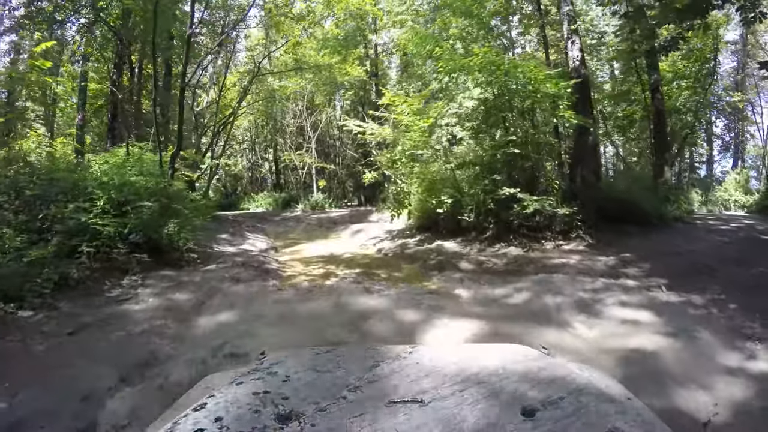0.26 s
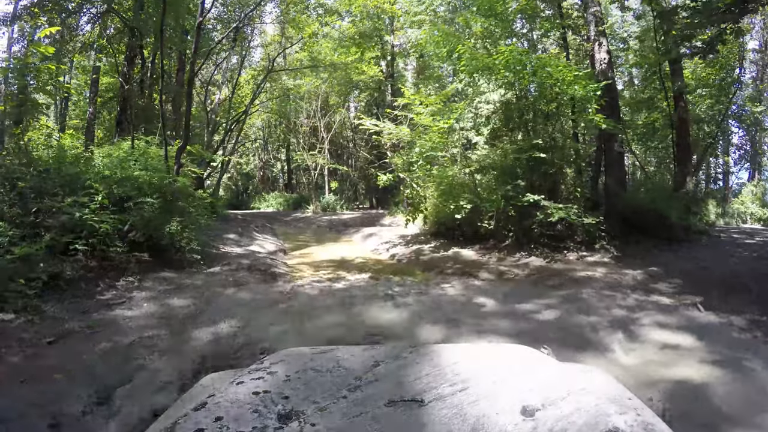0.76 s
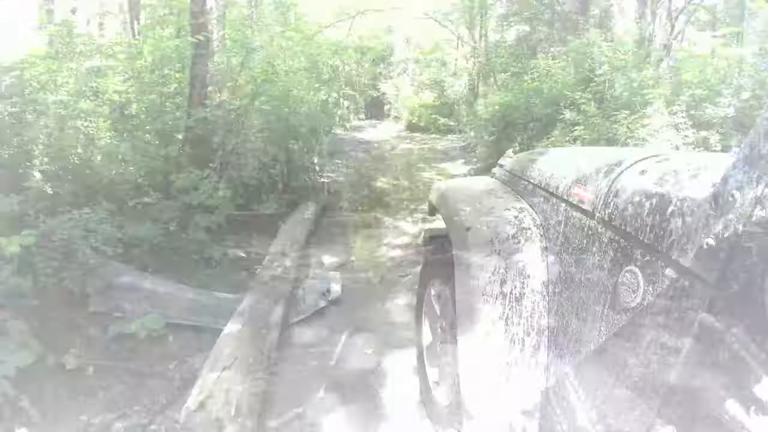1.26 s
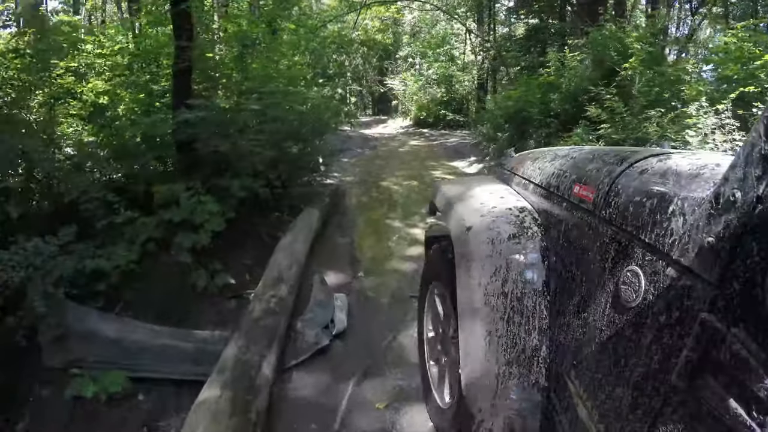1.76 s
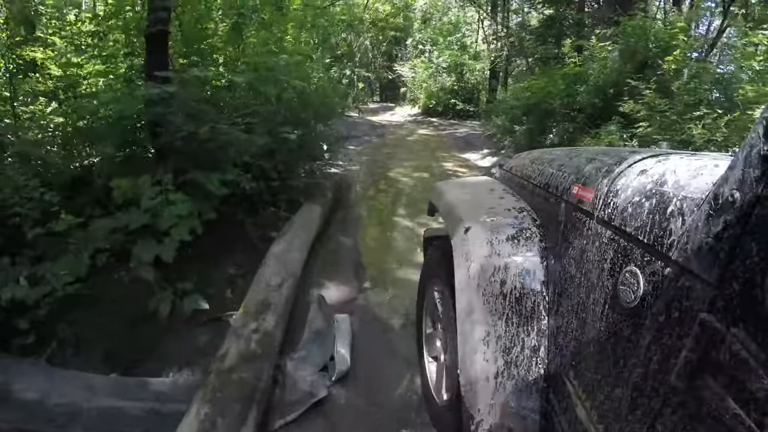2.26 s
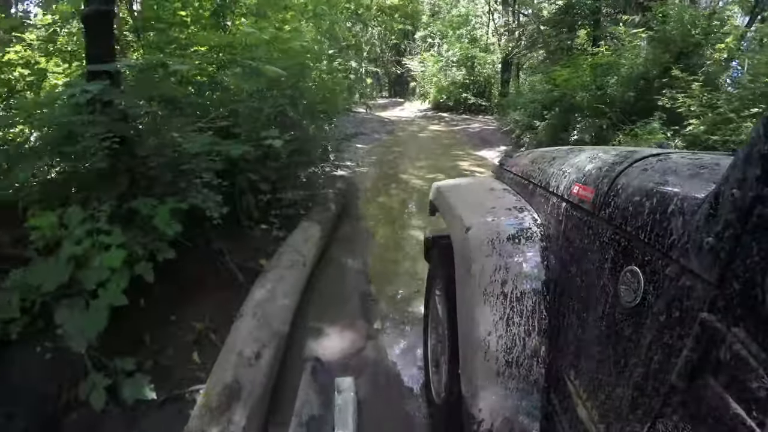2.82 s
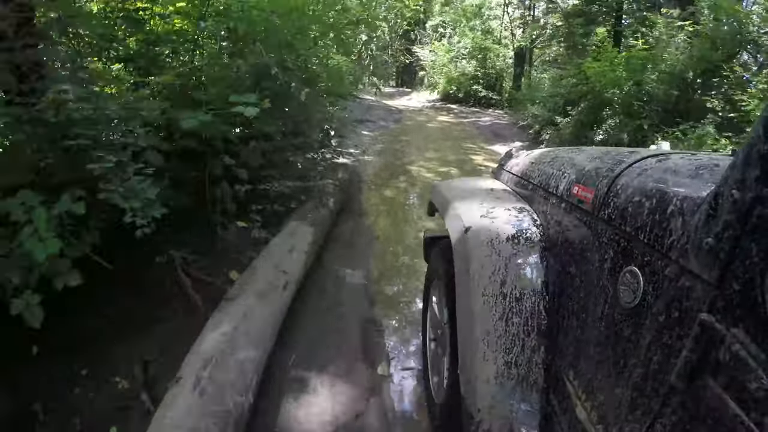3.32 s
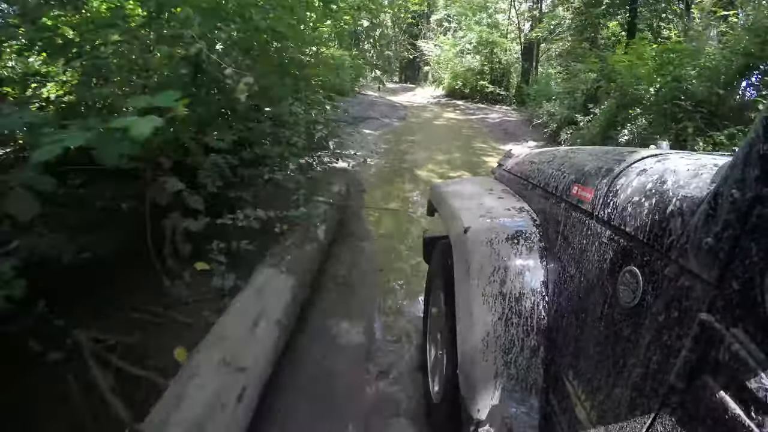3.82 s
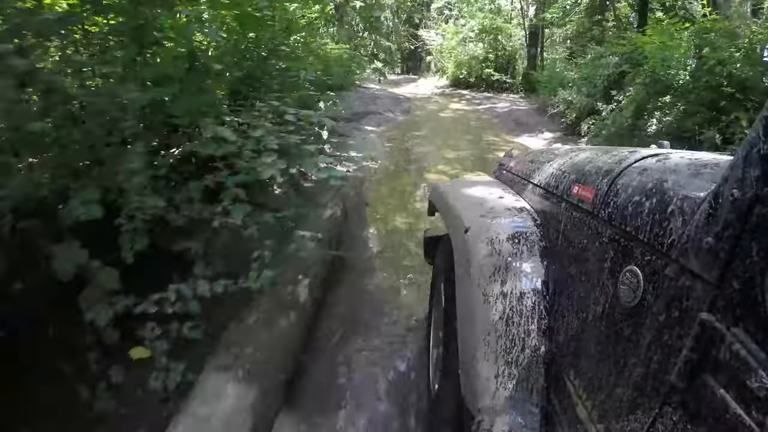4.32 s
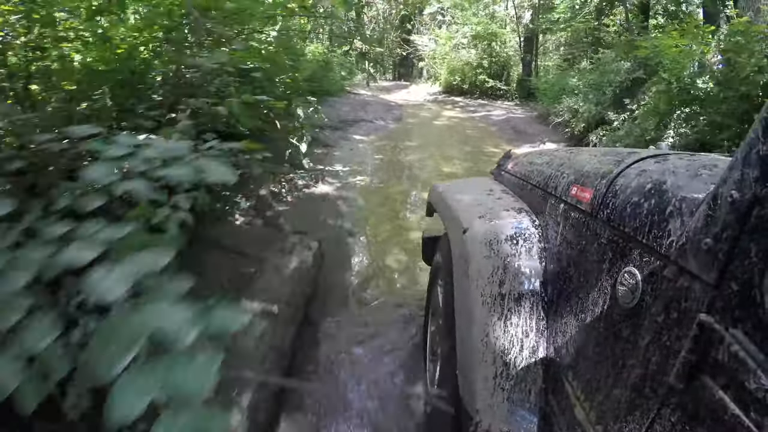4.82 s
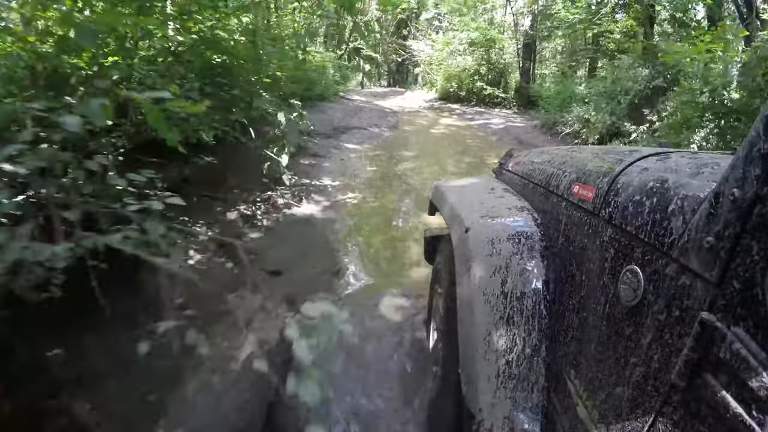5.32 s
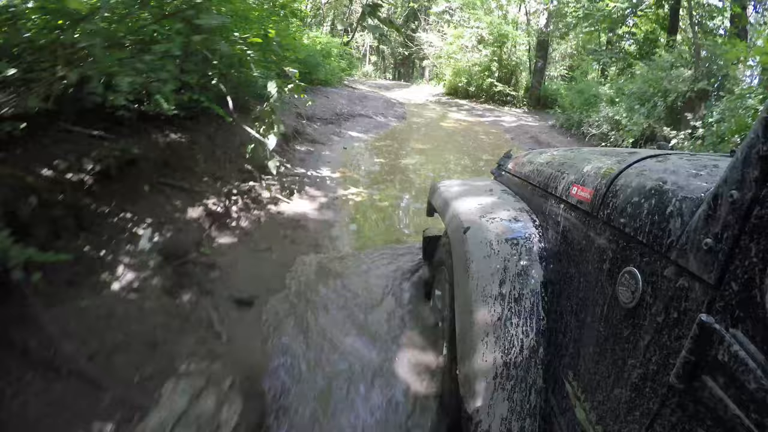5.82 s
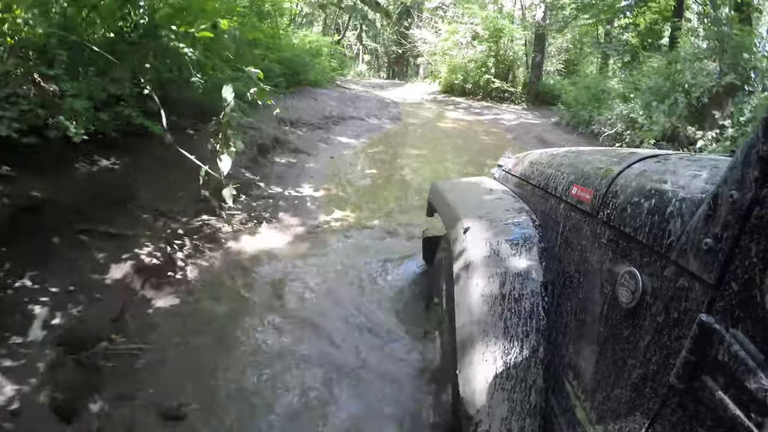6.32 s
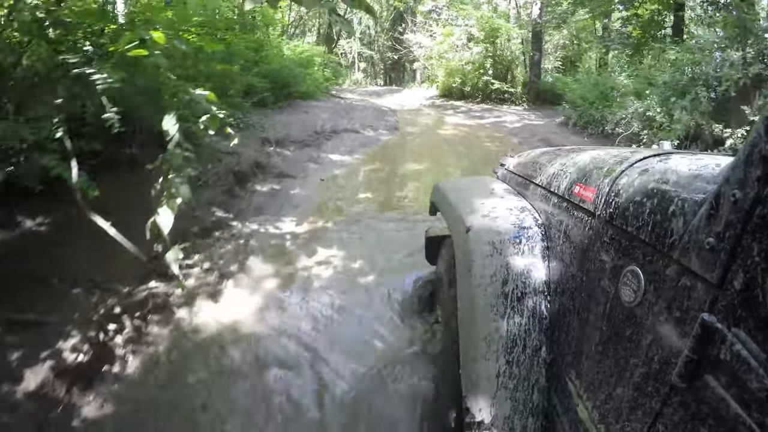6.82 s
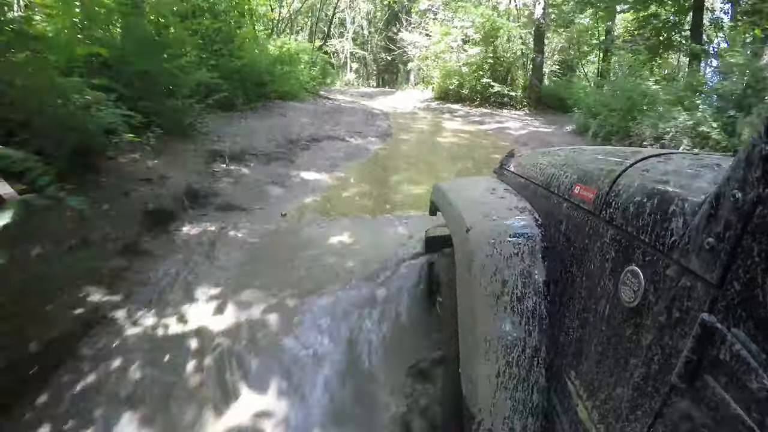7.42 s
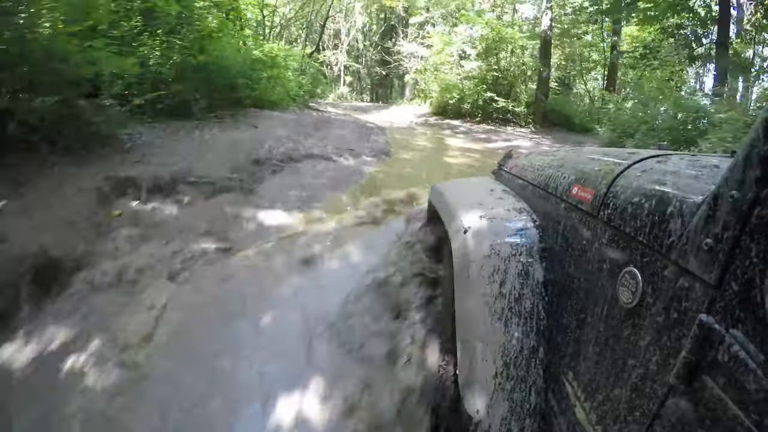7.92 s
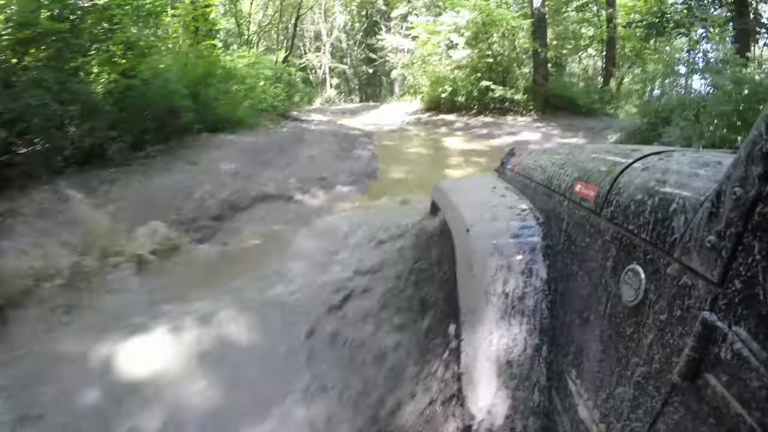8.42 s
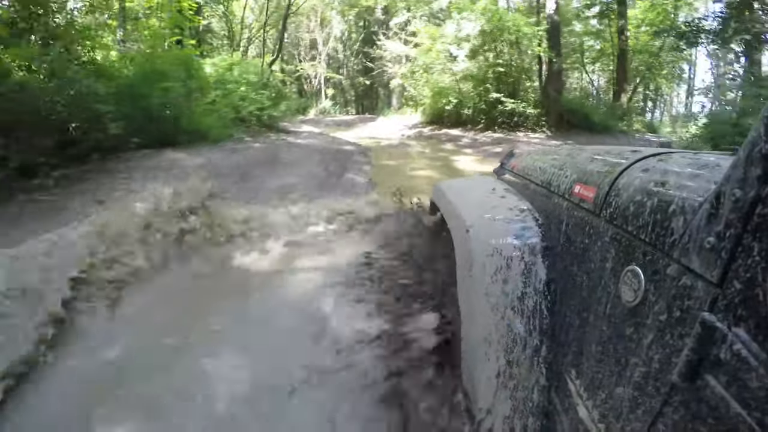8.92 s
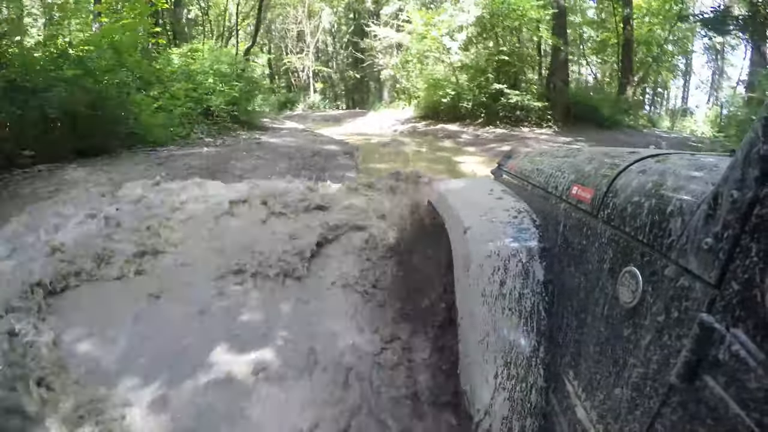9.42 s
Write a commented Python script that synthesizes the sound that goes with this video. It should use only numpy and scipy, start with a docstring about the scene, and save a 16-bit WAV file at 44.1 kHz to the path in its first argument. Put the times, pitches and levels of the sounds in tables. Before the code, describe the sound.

Low engine boom with a metallic rattle fades to quiet idling, crackling twigs and grit, then rising sloshing mud, roaring revs and suspension knocks.

```python
"""A six-cylinder four-wheel-drive engine on a forest trail, heard by a cased camera fixed to the body.
On the bonnet, sines at crankshaft orders and filtered noise drone and rev while a loose fitting rings.
The sound dissolves to the side of the cab: twigs and stones crack as noise bursts and ringing modes,
then a mud hole sloshes, splashes and bubbles, built of noise and tiny grains, as the engine revs up.
The camera mount shudders throughout, a low sine that sways and throbs."""
import sys
import numpy as np
from scipy import signal
from scipy.fft import rfft, irfft, next_fast_len
from scipy.io import wavfile
from scipy.ndimage import uniform_filter1d

SR = 44100
rng = np.random.default_rng(int(sys.argv[2]) if len(sys.argv) > 2 else 0)


def put_to_file(sound):
    """Save the sound as 16-bit audio at rate SR, in the file named by the first command-line argument."""
    columns = np.atleast_2d(sound).T  # one column per channel
    safe = np.clip(columns, -1, 1)
    whole_steps = np.round(safe * 32767)
    wavfile.write(sys.argv[1], SR, whole_steps.astype(np.int16))


N = 426006
T = np.arange(N) / SR


def amp(db):
    """Decibels to gain."""
    return 10 ** (np.asarray(db) / 20)


def evened(x):
    """Scales to rms 1."""
    return x / np.sqrt(np.mean(x ** 2) + 1e-20)


def noise():
    """White noise as long as the scene."""
    return rng.standard_normal(N)


def curves(rows):
    """Each column of a table, joined by straight lines in time."""
    s, *columns = np.transpose(rows)
    return [np.interp(T, s, c) for c in columns]


def response_db(points, modes, hz):
    """A broad spectrum, falling away beyond its end points, with resonant bumps on it."""
    f, db = np.transpose(points)
    broad = np.interp(np.log(hz + 1), np.log(f + 1), db)
    beyond = np.maximum(hz / f[-1], 1) * np.maximum(f[0] / (hz + 1), 1)
    bumps = sum(lift / (1 + (2 * (hz - centre) / width) ** 2) for centre, width, lift in modes)
    return broad - 30 * np.log10(beyond) + bumps


def coloured(x, points, modes=()):
    """Passes x through a spectrum and its resonances; rms 1."""
    size = next_fast_len(N + 8192)
    hz = np.fft.rfftfreq(size, 1 / SR)
    spectrum = rfft(x, size) * amp(response_db(points, modes, hz))
    return evened(irfft(spectrum, size)[:N])


def wander(rate_hz):
    """Smooth chance of rms 1 that changes at about this rate."""
    steps, rate = 8192, 800  # points, and points a second
    hz = np.fft.rfftfreq(steps, 1 / rate)
    slow = irfft(rfft(rng.standard_normal(steps)) * np.exp(-(hz / rate_hz) ** 2))
    return np.interp(T, np.arange(len(slow)) / rate, evened(slow))


def add(mix, s, sound):
    """Mixes a sound in at time s."""
    part = mix[max(round(s * SR), 0):][:len(sound)]
    part += sound[:len(part)]


def order_tone(turns, k):
    """A sine of rms 1 at k times the crankshaft."""
    return np.sqrt(2) * np.sin(2 * np.pi * (k * turns + rng.random()))


def cylinders(turns, whole_db, half_db, order, count):
    """Three firings a turn; unequal cylinders add whole and half orders between, from the given order up."""
    out = np.zeros(N)
    half_order_step = np.exp(1j * np.pi * turns)
    partial = np.exp(2j * np.pi * order * turns)
    for k in range(2 * order, 2 * order + count):  # k counts half orders
        strength = amp(0 if k % 6 == 0 else whole_db if k % 2 == 0 else half_db)
        start_phase = np.exp(2j * np.pi * rng.random())
        out += (strength * start_phase * partial).real
        partial = partial * half_order_step
    return evened(out)


def ring(modes, detune, rise_s):
    """One blow on a set of modes, never twice alike; peak 1."""
    t = np.arange(SR // 4) / SR
    hz, db, t60 = np.transpose(modes)[:, :, None]
    hz = hz * (1 + detune * rng.standard_normal(hz.shape))
    decay = amp(db - 60 * t / t60)
    sound = (decay * np.sin(2 * np.pi * (hz * t + rng.random(hz.shape)))).sum(0)
    sound *= 1 - np.exp(-t / rise_s)
    return sound / abs(sound).max()


def drops(per_s, spread_db):
    """A random train of impacts, most small and a few large."""
    size = amp(spread_db * np.minimum(rng.exponential(1, N), 4.5))
    return evened(size * noise() * (rng.random(N) < per_s / SR))


def patter(per_s, spread_db, grain_s, low_hz, high_hz):
    """Many tiny bursts, spread over twelve pitches."""
    t, out = np.arange(SR // 40) / SR, np.zeros(N)
    for hz in np.geomspace(low_hz, high_hz, num=12):
        fuzz = uniform_filter1d(rng.standard_normal(len(t)), size=int(4 * SR / hz))
        grain = evened(fuzz * np.sin(2 * np.pi * hz * t) * np.exp(-t / grain_s))
        out += signal.oaconvolve(drops(per_s / 12, spread_db), grain)[:N]
    return evened(out)


def firing_beat(turns):
    """Swings once for each of the three firings in a turn."""
    return np.cos(6 * np.pi * turns)


# Engine speed on the bonnet. Each row: time in seconds, crankshaft turns a second.
BONNET_SPEED = [(0, 39.4), (.3, 39), (.58, 37.7), (.8, 41), (1.12, 46.35), (1.28, 47.2), (1.55, 45.8)]
# Throttle on the bonnet. Each row: time in seconds, throttle from 0 to 1.
BONNET_THROTTLE = [(.6, 0.25), (.96, 0.61), (1.05, 0.87)]
# Booming low orders. Each row: multiple of the crankshaft, relative dB coasting, relative dB on throttle.
BOOM_ORDERS = [(3, -37.5, -11.5), (3.5, -20, -36.5), (4, -14.5, -35)]
# Rough boom around them. Each row: frequency in Hz, relative level in dB.
BOOM_COLOUR = [(30, -21), (55, 3.5), (75, -12.5), (100, -8), (122, 5), (160, 1), (195, -10), (260, -20.5),
               (400, -35)]
# Loudness of orders and boom together. Each row: time in seconds, level in dB.
BOOM_LEVEL = [(0.02, -17.5), (0.05, -24.5), (0.098, -32), (0.138, -15.5), (0.294, -18), (0.374, -12.5),
              (0.406, -17.5), (0.482, -23), (0.504, -14.5), (0.806, -23), (1.094, -12), (1.12, -16)]
# Upper orders. Each row: multiple of the crankshaft, dB coasting, dB on throttle, before WHINE_DB.
WHINE_ORDERS = [(5, -44, -54), (6, -45, -37), (7, -46, -51), (9, -53, -47), (10, -55, -60), (11, -54, -51),
                (12, -49, -50), (13, -64, -59), (15, -49, -66), (16, -62, -62), (17, -54, -50),
                (18, -47, -66), (19, -54, -59), (20, -61, -58), (21, -59, -53), (22, -60, -55),
                (23, -56, -54), (24, -53, -58), (25, -47, -55), (26, -54, -57), (27, -61, -50),
                (28, -61, -54), (31, -55, -58), (32, -53, -65), (35, -53, -68)]
# Mechanical clatter. Each row: frequency in Hz, relative level in dB.
CLATTER_COLOUR = [(180, -13.5), (260, 0), (420, -6.5), (600, -18.5), (850, -14.5), (1300, -12),
                  (1650, -19.5), (2200, -16.5), (2750, -27.5), (3600, -29), (5400, -32), (8000, -43.5),
                  (11000, -47.5), (15000, -64)]
# Clatter resonances. Each row: centre in Hz, width in Hz, lift in dB.
CLATTER_MODES = [(933, 65, 9), (1212, 35, 11), (2130, 630, 3.5)]
BOOM_COAST_DB, BOOM_PULL_DB = -22.5, -24  # rough boom against the low orders
WHINE_DB, WHINE_FLUTTER_DB = 1.5, 1.8
CLATTER_COAST_DB, CLATTER_PULL_DB = -33, -36.5


def engine_at_bonnet():
    """Low orders, rough boom, upper orders and clatter pulsing with the firings; throttle sets the balance."""
    turns = np.cumsum(curves(BONNET_SPEED)[0] * (1 + .0018 * wander(40))) / SR
    throttle = np.clip(curves(BONNET_THROTTLE)[0], 0, 1)

    def gain(coast_db, pull_db):
        """Gain between coasting and full throttle."""
        return amp(coast_db + throttle * (pull_db - coast_db))

    unsteady_db = 2.0 * (1 - throttle)  # the throttle evens the cylinders out
    low_orders = sum(gain(coast, pull) * amp(unsteady_db * wander(24)) * order_tone(turns, k)
                     for k, coast, pull in BOOM_ORDERS)
    boom = gain(BOOM_COAST_DB, BOOM_PULL_DB) * coloured(noise(), BOOM_COLOUR)
    whine = sum(gain(coast, pull) * amp(WHINE_DB + WHINE_FLUTTER_DB * wander(18)) * order_tone(turns, k)
                for k, coast, pull in WHINE_ORDERS)
    pulsing = 1 + 0.13 * firing_beat(turns)
    clatter = coloured(pulsing * noise(), CLATTER_COLOUR, CLATTER_MODES)
    clatter = gain(CLATTER_COAST_DB, CLATTER_PULL_DB) * clatter
    hum = low_orders + boom
    hum = hum / np.sqrt(uniform_filter1d(hum ** 2, size=SR // 6))  # levelled, so the curve sets loudness
    return amp(curves(BOOM_LEVEL)[0]) * hum + whine + clatter


# Sway of the camera mount on the bonnet. Each row: time in seconds, level in dB.
BONNET_SWAY = [(0, -16), (.12, -24), (.33, -26), (.39, -13.5), (.75, -13), (.89, -28), (1.05, -20),
               (1.16, -30)]
# Sway of the camera mount beside the cab. Each row: time in seconds, level in dB.
CAB_SWAY = [(1.3, -11.5), (1.75, -13), (2.0, -20.5), (2.3, -28.5), (2.6, -19.5), (3.0, -13.5), (3.8, -26.5),
            (4.3, -18), (4.8, -21.5), (5.3, -24.5), (5.5, -12.5), (5.72, -23.5), (6.6, -14.5), (7.0, -17.5),
            (7.18, -25), (7.3, -10.5), (7.55, -21), (7.75, -15), (7.97, -13), (8.39, -16), (8.7, -10.5),
            (9.3, -14), (9.66, -15.5)]
# Moments when the sway dies away and starts again in the opposite direction. Each entry: time in seconds.
LULLS = [1.979, 2.17, 2.6, 3.159, 3.4, 3.872, 4.51, 4.74, 4.84, 5.41, 6.801, 7.238, 7.451, 7.86, 8.8, 9.09,
         9.281, 9.42]
LULL_S = 0.039
SHUDDER_HZ = 38.33
THROB_HZ, THROB_DEPTH = 8.7, 0.25


def shudder(sway_rows):
    """The camera mount sways at its own low pitch and throbs unevenly as the trail shakes it."""
    phase = 2 * np.pi * np.cumsum(SHUDDER_HZ + 1.0 * wander(5.05)) / SR
    lulls = np.prod([np.tanh((T - s) / LULL_S) for s in LULLS], axis=0)
    throb = 1 + THROB_DEPTH * wander(THROB_HZ)
    sway = lulls * evened(throb * np.sin(phase))
    shake_colour = [(12, -2.0), (25, 0.5), (40, 1.5), (55, -9.5), (75, -18.5), (110, -25.5),
                    (200, -56.0)]  # Hz, relative dB
    shake = coloured(noise(), shake_colour)
    return amp(curves(sway_rows)[0]) * (sway + amp(-17) * shake)


# Contacts of a loose fitting. Each row: start in seconds, rms level in dB over the first 10 ms.
RATTLES = [(0.264, -28.5), (0.3808, -27), (0.394, -30), (0.434, -25.5), (0.4456, -28), (0.5225, -27),
           (0.5512, -26), (0.5764, -28), (0.9745, -31)]
# Ring of the fitting. Each row: frequency in Hz, relative level in dB, T60 in seconds.
RATTLE_MODES = [(2070, 5.5, 0.031), (2234, -1, 0.03), (2470, -14, 0.033), (3010, -16, 0.04),
                (3480, -14, 0.017), (4030, -15.5, 0.013), (4660, -19, .018), (5000, -17, .02),
                (5500, -21, .014), (6140, -23, 0.017), (6760, -22, 0.011), (7450, -30, 0.018),
                (8000, -23, 0.017), (9600, -34, 0.022), (11000, -27, .018)]
CHATTER_S, CHATTER_DB = 0.0021, -21.5  # scrape: its time constant, and its level under the blow


def rattles():
    """A loose metal fitting chatters on the bonnet; each contact is a blow and a brief scrape."""
    out, t = np.zeros(N), np.arange(SR // 100) / SR
    for s, db in RATTLES:
        blow = t == 0
        scrape = amp(CHATTER_DB) * rng.standard_normal(len(t)) * np.exp(-t / CHATTER_S)
        clink = signal.fftconvolve(blow + scrape, ring(RATTLE_MODES, detune=0.006, rise_s=0.0014))
        add(out, s, amp(db) * clink / clink[:len(t)].std())
    return out


# Faint ticks during the dissolve. Each row: start in seconds, peak in dB.
TICKS = [(1.062, -31), (1.129, -34), (1.229, -28.5), (1.295, -27), (1.362, -33)]


def ticks():
    """Thin, dry ticks, one sample long."""
    out = np.zeros(N)
    for s, db in TICKS:
        add(out, s, amp([db]))
    return out


# Engine speed beside the cab. Each row: time in seconds, crankshaft turns a second.
CAB_SPEED = [(1.6, 24.7), (1.8, 27.7), (2.0, 27.5), (2.25, 23), (3.1, 26.3), (4.6, 24), (7.9, 24.2),
             (8.05, 27.5), (8.2, 31.2), (8.33, 36.4), (8.48, 38.5), (8.65, 42), (8.85, 43), (8.95, 46.1),
             (9.17, 47.2), (9.3, 45.5), (9.42, 44), (9.54, 44.7), (9.66, 45.3)]
# Load on the engine. Each row: time in seconds, exhaust level in dB before its orders and resonances.
LOAD = [(1.4, -60.5), (6, -51), (8.08, -43), (8.22, -37), (8.42, -36.5), (8.62, -36), (8.88, -41),
        (9.02, -36.5), (9.28, -32.5), (9.45, -29.5), (9.66, -38)]
# Low exhaust orders. Each row: multiple of the crankshaft, dB over the load level.
EXHAUST_ORDERS = [(2, 1), (3, 1), (4, 7.5), (5, -2), (6, 1.5)]
# Exhaust response. Each row: frequency in Hz, gain in dB.
EXHAUST_COLOUR = [(45, -6.5), (90, -8.5), (135, -22.5), (200, -16), (280, -23)]
# Exhaust resonances. Each row: centre in Hz, width in Hz, lift in dB.
EXHAUST_MODES = [(100.8, 6, 3.5), (184.1, 15, 19), (223, 15.6, 24), (417, 13, 17), (639, 63, 18)]
# Upper orders that howl at high revs. Each row: multiple of the crankshaft, dB over the load level.
HOWL_ORDERS = [(9, -2), (11, -3), (12, -6), (14, -2), (18, 3)]
# Howl response. Each row: frequency in Hz, gain in dB.
HOWL_COLOUR = [(230, -43), (340, -23), (480, -24), (680, -21), (850, -36)]
# Howl resonances. Each row: centre in Hz, width in Hz, lift in dB.
HOWL_MODES = [(415.7, 16.5, 16.5), (638, 48, 12.5)]
# Drone through the body. Each row: time in seconds, dB applied to the mix of firings and rumble.
DRONE = [(1.4, -48), (2.7, -51), (3.4, -50.5), (5.0, -50.5), (6.3, -50.5), (7.3, -47), (7.9, -41.5),
         (8.4, -33), (8.72, -34), (9.0, -33), (9.66, -31)]
# Body response beside the cab. Each row: frequency in Hz, relative level in dB.
CAB_COLOUR = [(45, -19), (65, -23.5), (90, -3.5), (135, -2), (190, -5.5), (260, -13), (350, -18.5),
              (480, -19.5), (650, -22), (900, -20)]
# Body resonances beside the cab. Each row: centre in Hz, width in Hz, lift in dB.
CAB_MODES = [(104, 9.4, 9), (184.2, 12, 16.5), (232.9, 7.6, 14), (350, 20, 18), (413, 9.3, 11.5),
             (633, 37, 11)]
# a dab of throttle brings out the firing order
DAB_S, DAB_WIDTH_S, DAB_DB = 1.91, 0.28, -42


def engine_at_cab():
    """Exhaust orders boom as revs cross resonances; firings and rumble drone through the body."""
    speed = curves(CAB_SPEED)[0] * (1 + 0.0039 * wander(15.0))
    turns = np.cumsum(speed) / SR

    def resonant_orders(rows, colour, modes):
        """Order tones, each as loud as the response at its present pitch."""
        return [amp(db + response_db(colour, modes, k * speed)) * order_tone(turns, k) for k, db in rows]

    orders = resonant_orders(EXHAUST_ORDERS, EXHAUST_COLOUR, EXHAUST_MODES)
    orders += resonant_orders(HOWL_ORDERS, HOWL_COLOUR, HOWL_MODES)
    exhaust = sum(tone * amp(1.6 * wander(15)) for tone in orders)
    dab = amp(DAB_DB) * np.exp(-((T - DAB_S) / DAB_WIDTH_S) ** 2) * order_tone(turns, k=3)
    firings = cylinders(turns, whole_db=4.0, half_db=0, order=7, count=44)
    upper = coloured(firings, CAB_COLOUR, CAB_MODES)
    rumble = coloured(noise(), CAB_COLOUR, CAB_MODES)
    drone = amp(curves(DRONE)[0]) * (amp(-6.5) * upper + amp(-2.0) * rumble)
    return dab + amp(curves(LOAD)[0]) * exhaust + drone


# Tyres in mud and water. Each row: time in seconds, slosh level in dB, splash level in dB.
WATER = [(1.5, -56, -52.5), (3.1, -59, -56.5), (4.3, -60, -53.5), (5.64, -56, -50.5), (5.75, -50.5, -45.5),
         (6.5, -54, -45.5), (7.2, -50.5, -44), (7.75, -41, -38.5), (8.4, -37, -33.5), (9.0, -38.5, -36),
         (9.66, -38.5, -31)]
# Heavy slosh. Each row: frequency in Hz, relative level in dB.
SLOSH_COLOUR = [(150, -39), (250, -34), (262, -7), (350, -2), (449, -4.5), (639, -5.5), (704, -13.5),
                (1090, -3.5), (1460, -11), (1700, -17), (2210, -47), (3740, -120)]
# Splashes on panels. Each row: frequency in Hz, relative level in dB.
SPLASH_COLOUR = [(900, -13), (1550, -12.5), (1900, -2.5), (2200, -6), (2550, -3), (3050, -11), (3600, -6.5),
                 (4500, -9), (5100, -17), (6100, -12.5), (7800, -20), (9000, -27.5), (12000, -28.5)]
# Fine spray. Each row: frequency in Hz, relative level in dB.
SPRAY_COLOUR = [(4000, -2.5), (6500, -1), (7900, -4.5), (9100, -14.5), (10000, -12.5), (12000, -19.5),
                (15000, -23.5)]
# Camera case, also heard in grit and snaps. Each row: centre in Hz, width in Hz, lift in dB (minus dips).
CASE_MODES = [(302, 49, 11.5), (350, 58, 8), (508, 60, 9), (642, 21, 8), (1100, 81, 5.5), (1932, 135, 5),
              (2190, 100, -5.5), (2375, 370, 6), (2895, 76, 5), (3110, 230, -4), (3465, 81, 3.5),
              (3910, 550, 3), (4605, 200, 5.5), (5770, 250, 3.5), (6430, 140, -5.5), (6670, 160, 6.5),
              (6930, 240, -7), (9900, 680, 4), (11650, 600, 4)]
SPRAY_DB, SPRAY_GROWTH = -1, 1.158  # spray level at a splash of 0 dB, and its dB for each dB of splash


def water():
    """Tyres churn lumps of water that splash on the panels; the harder the splash, the more fine spray."""
    slosh_db, splash_db = curves(WATER)
    spray_db = SPRAY_DB + SPRAY_GROWTH * splash_db
    surge = wander(13)  # shared by splash and spray
    lumps = drops(250, spread_db=2.5)
    splats = patter(900, spread_db=0.5, grain_s=0.013, low_hz=1504.4, high_hz=7960)
    droplets = patter(1500, spread_db=2.5, grain_s=.002, low_hz=3990, high_hz=13980)
    churn = (noise() + 0.49 * lumps) * amp(1.25 * wander(10.2))
    slosh = coloured(churn, SLOSH_COLOUR, CASE_MODES)
    splash = coloured((noise() + 0.35 * splats) * amp(0.63 * surge), SPLASH_COLOUR, CASE_MODES)
    spray = coloured((noise() + 0.5 * droplets) * amp(0.75 * surge), SPRAY_COLOUR, CASE_MODES)
    return amp(slosh_db) * slosh + amp(splash_db) * splash + amp(spray_db) * spray


def bubbles():
    """Air trapped by the tyres rings as bubbles of eight sizes, each rising a little in pitch."""
    t, out = np.arange(SR // 10) / SR, np.zeros(N)
    for hz in np.geomspace(1800, 2700, num=8):
        envelope = np.exp(-t * hz / 18) * (1 - np.exp(-t / 0.0027))
        bubble = np.sin(2 * np.pi * hz * t * (1 + 0.15 * t)) * envelope
        out += signal.oaconvolve(drops(12, spread_db=1.8), bubble)[:N]
    splash_db = curves(WATER)[1]
    return amp(splash_db - 19) * evened(out)


# Grit and leaves on the body. Each row: time in seconds, level in dB.
GRIT = [(2.1, -84), (2.4, -54.5), (3.27, -76), (3.3, -53), (3.47, -48), (3.6, -56.5), (3.82, -51),
        (4.1, -56), (4.4, -60), (5.2, -57), (7, -51), (9.66, -41.5)]
# Their spectrum. Each row: frequency in Hz, relative level in dB.
GRIT_COLOUR = [(900, -3.5), (1500, -5.5), (1950, 1.5), (2550, -7.5), (3050, -18), (3700, -1), (4800, -2),
               (6100, -7.5), (8000, -13), (12000, -27.5)]


def grit():
    """Tyres crush grit and leaves brush the body: a swish with a soft crackle of brief crumblings."""
    grains = patter(1100, spread_db=1.5, grain_s=.002, low_hz=2000, high_hz=11000)
    return amp(curves(GRIT)[0]) * coloured(grains + 0.77 * noise(), GRIT_COLOUR, CASE_MODES)


# Twigs, stones and branches under and along the truck.
# Each row: start in seconds, level in dB (peaks 4 dB lower), centre in Hz, T60 in seconds.
SNAPS = [(2.027, -37, 6000, .03), (2.385, -32.5, 2800, 0.1), (2.447, -34, 3200, 0.092),
         (2.531, -40, 1708, 0.063), (2.691, -30, 2300, 0.29), (2.887, -40, 8120, 0.051),
         (2.933, -28, 2600, 0.058), (3.271, -43, 5500, .025), (3.292, -37, 9500, 0.021),
         (3.301, -31, 6500, 0.046), (3.315, -35, 7000, 0.22), (3.334, -35, 3600, .03),
         (3.344, -42, 5000, .025), (3.439, -44, 4300, 0.094), (3.589, -37, 4200, 0.021),
         (3.652, -41, 8900, 0.034), (3.706, -33, 1800, 0.3), (3.763, -35, 1900, 0.087),
         (3.815, -30, 2400, 0.23), (3.9, -39, 7500, 0.24), (3.968, -38, 7960, .032),
         (4.039, -31, 1600, 0.047), (4.19, -36, 1600, 0.14), (4.36, -40, 4475, .03),
         (4.414, -32.5, 5000, 0.031), (4.458, -36, 7000, 0.05), (4.523, -32, 8500, 0.067),
         (4.928, -37, 5000, .02), (5.099, -34, 7500, 0.018), (5.594, -33, 3500, 0.087),
         (5.678, -22.5, 2420, 0.087), (5.694, -27, 2200, 0.05), (5.709, -32, 3800, .16),
         (5.763, -31, 7000, .06), (6.474, -24.5, 5200, 0.019), (7.828, -24, 4200, 0.035),
         (9.409, -16, 1750, 0.036)]
# Snap spectrum. Each row: frequency in Hz, relative level in dB.
SNAP_COLOUR = [(300, -1), (1100, 10), (2100, 7.5), (2600, 11), (3100, 3.5), (3950, 12), (4800, 0),
               (8000, 1), (15000, -41)]
SNAP_GRAIN_DB = -1.5  # spread in size of the tiny fractures within a crunch
CRACKS_PER_S, CRACK_DB = 400, 16.5  # sharp cracks among them, and their level over the crunch


def snaps():
    """Crunches of wood and grit through the camera case; longer ones swell as the material gives way."""
    out, t = np.zeros(N), np.arange(SR // 3) / SR
    hz = np.fft.rfftfreq(len(t), 1 / SR)
    case_db = response_db(SNAP_COLOUR, CASE_MODES, hz)
    for s, db, centre_hz, t60 in SNAPS:
        swell = 1 - np.exp(-t / (t60 ** 2 / 2))
        unevenness = evened(uniform_filter1d(rng.standard_normal(len(t)), size=130))
        fractures = amp(SNAP_GRAIN_DB * unevenness)
        cracks = 1 + amp(CRACK_DB) * (rng.random(len(t)) < CRACKS_PER_S / SR)
        burst = rng.standard_normal(len(t)) * cracks * fractures * swell * amp(-60 * t / t60)
        band_db = -6.1 * np.log2((hz + 1) / centre_hz) ** 2
        crunch = irfft(rfft(burst) * amp(case_db + band_db), len(t))
        first_half = t < t[-1] / 2  # drops the wrapped-round filter tail
        add(out, s, amp(db - 4.0) * crunch / abs(crunch).max() * first_half)
    return out


# Stones flung by the tyres against the body. Each row: start in seconds, peak in dB.
STONES = [(2.0644, -27), (2.0665, -27.5), (2.073, -41), (3.301, -34), (3.772, -36), (5.699, -28)]
# Ring of panel and case. Each row: frequency in Hz, relative level in dB, T60 in seconds.
STONE_MODES = [(1075, -19, 0.068), (1300, -13, .04), (1965, -12, 0.097), (2520, -4, 0.036),
               (2730, -9, 0.02), (3750, -8, 0.027), (3980, 3, 0.012), (4800, -9, 0.013),
               (5200, -15, 0.0088), (6000, -14, .018), (6780, -18, 0.018), (7250, -11, 0.014),
               (10000, -21, .01), (11800, -25, .01)]


def stones():
    """Each stone gives one sharp blow that rings a panel and the camera case."""
    out = np.zeros(N)
    for s, db in STONES:
        add(out, s, amp(db) * ring(STONE_MODES, detune=0.003, rise_s=0.000067))
    return out


# Suspension knocks. Each row: start in seconds, peak in dB, centre in Hz.
KNOCKS = [(3.698, -32, 566), (5.335, -35.5, 377), (5.564, -40.5, 380), (5.667, -41, 315), (6.227, -56, 200),
          (8.866, -19.5, 350), (8.907, -26, 414), (9.071, -22.5, 407), (9.104, -14, 350), (9.151, -17, 350),
          (9.411, -21.5, 350), (9.598, -23, 350)]
# Body around the blow. Each row: frequency in Hz, relative dB before the fall from centre, T60 in seconds.
KNOCK_MODES = [(188, -14, .14), (303, 21.5, 0.14), (356, 22, 0.2), (408, -10, 0.091), (502, 5.5, 0.2),
               (587, 13, 0.091), (845, -16, .08), (1140, 0, .12), (1310, 0, .08), (2000, -12, .05)]
PART_DB, PART_T60_S = 13.5, 0.27  # the ring of the part that is struck, relative to the body modes


def knocks():
    """The suspension knocks over roots and ruts; each blow rings the struck part and the body around it."""
    out = np.zeros(N)
    for s, db, centre_hz in KNOCKS:
        # body modes weaken by 5 dB an octave away from the struck part
        body = [(hz, level - 5 * abs(np.log2(hz / centre_hz)), t60) for hz, level, t60 in KNOCK_MODES]
        struck_part = (centre_hz, PART_DB, PART_T60_S)
        add(out, s, amp(db) * ring(body + [struck_part], detune=0.0072, rise_s=0.00037))
    return out


# Surges of muddy water. Each row: crest in seconds, level in dB, half length in seconds, centre in Hz.
SURGES = [(5.81, -46, 0.032, 2000), (9.083, -35, 0.011, 2600), (9.113, -25, 0.022, 600),
          (9.124, -34.5, 0.038, 1100), (9.154, -27.5, 0.039, 320), (9.13, -40, 0.05, 2100),
          (9.161, -33, 0.015, 1410)]
# Wheel arch resonances. Each row: centre in Hz, width in Hz, lift in dB.
ARCH_MODES = [(299, 65, 32), (360, 56, 21), (523, 60, 8), (1110, 160, 21), (1310, 38, 18.5),
              (1900, 110, 30), (2440, 310, 24)]
ARCH_FALL_DB = 28  # fall of a surge three octaves from its centre, before the arch resonances


def surges():
    """Masses of muddy water swell against the wheel arch and make its panels resound."""
    out = np.zeros(N)
    for s, db, half_s, centre_hz in SURGES:
        hump = [(centre_hz / 8, -ARCH_FALL_DB), (centre_hz, 0), (centre_hz * 8, -ARCH_FALL_DB)]
        swell = np.exp(-((T - s) / half_s) ** 2)
        out += amp(db) * swell * coloured(noise(), hump, ARCH_MODES)
    return out


# the bonnet fades out and the side of the cab fades in between these times
DISSOLVE_FROM_S, DISSOLVE_TO_S = 1.105, 1.495


def scene():
    """The bonnet dissolves into the side of the cab."""
    beside = np.sin(np.interp(T, [DISSOLVE_FROM_S, DISSOLVE_TO_S], [0, np.pi / 2])) ** 2
    bonnet = engine_at_bonnet() + rattles() + shudder(BONNET_SWAY)
    wet = water() + surges() + bubbles()
    trail = grit() + snaps() + stones() + knocks()
    cab = engine_at_cab() + wet + trail + shudder(CAB_SWAY)
    return ((1 - beside) * bonnet + beside * cab + ticks())[None]


EDGE_HZ = 15400


def record(dry):
    """The recorder's band limit: a steep low-pass."""
    low_pass = signal.firwin(511, EDGE_HZ, window=("kaiser", 9), fs=SR)
    return signal.oaconvolve(dry, low_pass[None], "same")


dry = scene()
out = record(dry)
put_to_file(out)
```